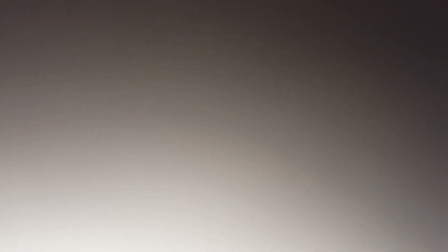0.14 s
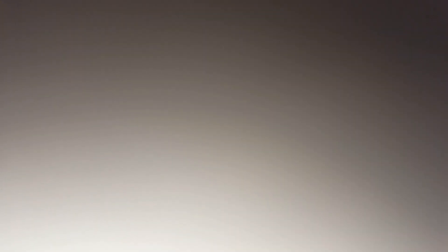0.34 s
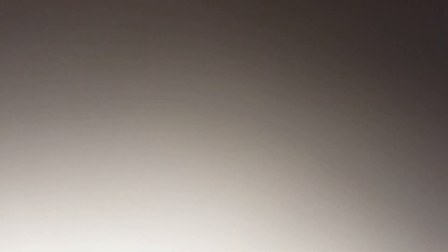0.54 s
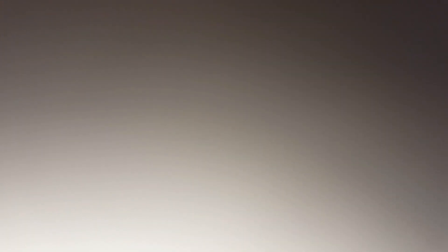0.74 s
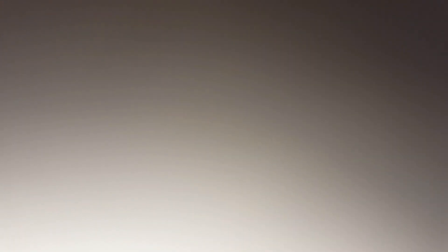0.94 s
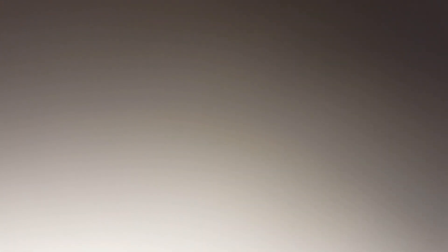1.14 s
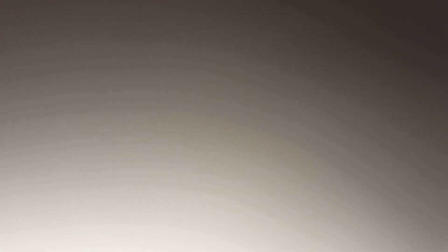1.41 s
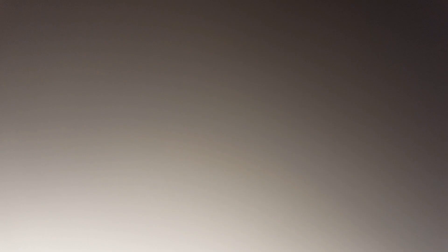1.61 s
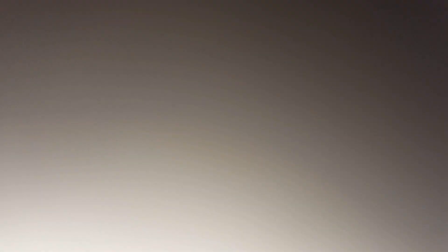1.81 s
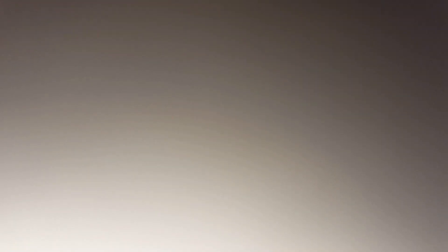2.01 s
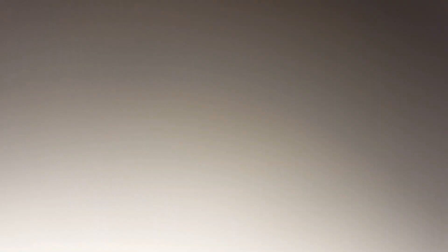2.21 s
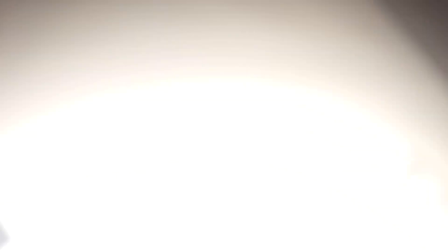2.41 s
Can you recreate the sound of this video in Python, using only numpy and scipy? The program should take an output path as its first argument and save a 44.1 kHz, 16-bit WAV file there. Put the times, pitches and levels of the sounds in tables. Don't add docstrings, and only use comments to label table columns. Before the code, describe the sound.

Bright roaring air jet escaping a valve, jolting once, dying down amid handling creaks, final click

```python
import sys
import numpy as np
from scipy import signal
from scipy.fft import rfft, irfft, next_fast_len
from scipy.io import wavfile
from scipy.ndimage import map_coordinates

SR = 44100
rng = np.random.default_rng(int(sys.argv[2]) if len(sys.argv) > 2 else 0)


def to_wav(sig):
    pcm = np.clip(np.atleast_2d(sig), -1, 1) * 32767
    pcm = np.round(pcm).astype(np.int16)
    wavfile.write(sys.argv[1], SR, pcm.T)


def voltage_ratio(decibels):
    exponent = np.asarray(decibels, float) / 20
    return 10 ** exponent


N = 112454

ALIKE_LOW, ALIKE_HIGH = 0.52, 0.33


def rms_one(x):
    return x / np.sqrt(np.mean(x ** 2, axis=-1, keepdims=True) + 1e-20)


def noise(*shape):
    return rng.standard_normal(shape)


def band(x, low_hz, high_hz, order=2):
    return signal.sosfilt(signal.butter(order, [low_hz, high_hz], "band", fs=SR, output="sos"), x)


def stereo(right_db):
    return voltage_ratio([[0], [right_db]])


def in_time(rows):
    s, *columns = np.transpose(rows)
    return [np.interp(np.arange(N) / SR, s, c) for c in columns]


def drift(rate_hz):
    r = np.exp(-40 * np.pi * rate_hz / SR)
    slow = signal.lfilter([1], [1, -2 * r, r * r], noise(N // 20 + 4002))[4000:]
    return np.interp(np.arange(N) / 20, np.arange(len(slow)), rms_one(slow))


def ring(x, hz, t60_s):
    r = voltage_ratio(-60 / (t60_s * SR))
    w = 2 * np.pi * hz / SR
    return signal.lfilter([0, np.sin(w)], [1, -2 * r * np.cos(w), r * r], x + 1e-18)


def gate(start_s, length_s, attack_s, release_s):
    t = np.arange(N) / SR - start_s
    return np.clip(t / attack_s, 0, 1) * np.exp(-np.clip(t - length_s, 0, None) / release_s)


def swept(hz, width_hz):
    r = np.exp(-np.pi * width_hz * 1.5 / SR)
    turn = 2 * np.pi * np.cumsum(hz) / SR
    slow = signal.lfilter([1], [1, -2 * r, r * r], noise(2, N))
    return rms_one(slow[0] * np.cos(turn) + slow[1] * np.sin(turn))


def air(left, right, alike, patchy_db, together_db, tilt_db=0, count=14):
    # frequency in Hz, phase in radians.
    port_phase = [(1000, 0.1), (1900, 2), (2450, 3.2), (3200, 6.1), (4150, 7.7), (4900, 10), (6200, 9.5),
                  (8200, 14)]
    size = next_fast_len(N)
    hz = np.arange(size // 2 + 1) * SR / size + 1e-3
    shared, own_left, own_right = rfft(noise(3, size))
    lag = np.exp(-1j * np.interp(hz, *np.transpose(port_phase)))
    common, own = np.sqrt(alike) * shared, np.sqrt(1 - alike)
    pair = np.array([common * lag + own * own_left, common + own * own_right])
    for side, points in zip(pair, (left, right)):
        f, db = np.transpose(points)
        knots = np.log([f[0] / 2, *f, f[-1] * 2])
        side *= voltage_ratio(np.interp(np.log(hz), knots, [db[0] - 30, *db, db[-1] - 30]))
    pair /= np.sqrt(np.mean(abs(pair) ** 2, axis=1, keepdims=True) / size)

    centres = np.geomspace(left[0][0], left[-1][0], count)
    place = np.interp(np.log(hz), np.log(centres), np.arange(count))
    together = together_db * drift(8.3)
    out = 0
    for k, centre in enumerate(centres):
        flicker = np.array([patchy_db * drift(2.0), patchy_db * drift(6.7)])
        level_db = flicker + together + tilt_db * np.log2(centre / 10000)
        weight = np.clip(1 - abs(place - k), 0, 1)
        out = out + voltage_ratio(level_db) * irfft(pair * weight, size)[:, :N]
    return out


def bounced(x):
    # delay in seconds, left gain, right gain.
    bounces = [
        (.00031, .3, .15),
        (.0013, .25, .25),
        (.0037, .25, .25),
        (.0081, .25, .25),
    ]
    sway_s = 0.000025
    out = x.copy()
    for lag_s, *gains in bounces:
        delay_s = lag_s + sway_s * np.sqrt(lag_s / 0.00027) * drift(1.3)
        late = np.arange(N) - delay_s * SR
        out += [g * map_coordinates(side, [late], order=3, mode="mirror") for side, g in zip(x, gains)]
    return out


def jet():
    # time in seconds, level in dB, left over right in dB,
    # brightness in dB per octave, roar against hiss in dB.
    flow = [(0, -21, 3.5, 2, -3.5), (.27, -22.5, 7, -0.9, -1.5), (.52, -18, 5.5, 0.4, 0),
            (.73, -22, 5, -1, -2), (.9, -21.5, 7, 2, 0.5), (1.02, -27.5, 8, 1, 0.5), (1.29, -31, 9, 0, 1.5),
            (1.4, -25, 5.5, -1.5, -2), (1.65, -35.5, 4, -0.5, 3), (1.92, -34, 4, -4.5, -2.5),
            (1.99, -32, 3.5, 4.5, 4.5), (2.025, -47, 7, 3, 2), (2.055, -40.5, 7, -5, 0),
            (2.115, -47, 5, -3, 10), (2.225, -48.5, 4, -4, 4.5), (2.245, -55.5, 4, 7, 9),
            (2.42, -52.5, 9.5, -4, 7), (2.55, -54.5, 2, -1, 7)]
    # frequency in Hz, density in dB per Hz.
    hiss_left = [(3300, -20), (4250, -2.5), (6050, -11.5), (6900, -7), (8900, 0.5), (10400, -8.5),
                 (13900, 2), (16000, -15.5)]
    hiss_right = [(3300, -12), (4600, -8), (6000, -8), (7900, 0), (9900, -10), (12500, -1), (14200, -2),
                  (16000, -2)]
    roar_colour = [(30, -12), (95, -3), (380, -4), (1300, 0.5), (2000, 1), (2400, 2.5), (2800, 0.5),
                   (4500, -50)]
    ridge_hz, ridge_width_hz, ridge_db, roar_base_db = 4130, 170, -17, -12

    db, pan_db, tilt_db, roar_db = in_time(flow)
    left_db, right_db = db + pan_db / 2, db - pan_db / 2
    hiss = air(hiss_left, hiss_right, ALIKE_HIGH, patchy_db=0.9, together_db=0.8, tilt_db=tilt_db)
    hiss = bounced(voltage_ratio([left_db, right_db]) * hiss)
    ridge = voltage_ratio(left_db + ridge_db + 2 * drift(8)) * swept(ridge_hz + 40 * drift(2), ridge_width_hz)
    roar = air(roar_colour, roar_colour, ALIKE_LOW, patchy_db=1.1, together_db=1.1)
    roar = voltage_ratio(roar_base_db + roar_db + right_db + 1.5 * drift(35)) * roar
    return hiss + ridge * stereo(-15) + roar


def surges():
    # start in seconds, length in seconds, level in dB, sag in dB per second.
    openings = [
        (0.541, 0.13, -17, 26),
        (1.307, 0.39, -34.5, 17),
        (1.942, 0.082, -42.5, 14),
    ]
    # frequency in Hz, density in dB per Hz.
    colour_left = [(2450, -22), (2850, -14), (3600, -6.5), (4150, 3.5), (4750, -5), (5400, -34),
                   (7300, -1.5), (15800, -47)]
    colour_right = [(2450, -26), (2800, 0), (4300, 0), (6300, -1), (8000, -5), (9600, -12), (15800, -12)]
    # start in seconds, end in seconds, frequency in Hz, width in Hz.
    whistle = (2.123, 2.232, 8750, 950)
    attack_s, release_s, right_db, whistle_db = 0.0015, 0.013, -5, -43

    t = np.arange(N) / SR
    shape = 0
    for start_s, length_s, db, sag in openings:
        sagging_db = db - sag * np.clip(t - start_s, 0, length_s)
        shape = shape + voltage_ratio(sagging_db) * gate(start_s, length_s, attack_s, release_s)
    hiss = air(colour_left, colour_right, ALIKE_LOW, patchy_db=1.6, together_db=1.3, count=10)

    start_s, end_s, hz, width_hz = whistle
    thin = rms_one(band(noise(N), hz - width_hz / 2, hz + width_hz / 2))
    thin = voltage_ratio(whistle_db) * gate(start_s, end_s - start_s, 0.0052, 0.0034) * thin
    return shape * stereo(right_db) * hiss + thin * stereo(-14)


def throat():
    # time in seconds, level in dB, frequency in Hz.
    course = [
        (.541, -62, 3700),
        (.546, -18.5, 3800),
        (.575, -16, 4334),
        (.615, -16, 4400),
        (.635, -25, 4450),
        (.7, -20, 4180),
        (.73, -46, 4230),
        (.8, -70, 4060),
    ]
    width_hz = 530
    db, hz = in_time(course)
    return voltage_ratio(db + 1.8 * drift(60)) * swept(hz, width_hz) * stereo(-16)


def cup():
    # time in seconds, level in dB, cavity frequency in Hz.
    cavity = [(0, -59, 1350), (.1, -34.5, 1400), (.27, -49.5, 1383), (.35, -32.5, 1436), (.43, -43, 1362),
              (.56, -38, 1294), (.83, -42, 1277), (1.27, -58, 1900), (1.34, -34.5, 1550),
              (1.41, -28.5, 1317), (1.47, -29.5, 1220), (1.53, -45.5, 1300), (1.78, -55, 1597),
              (1.87, -34, 1277), (2.02, -41.5, 1378), (2.2, -48.5, 1339), (2.40, -45, 1598),
              (2.455, -55, 1630)]
    width_hz, grain_db = 200, 2.5
    upper_ratio, upper_width_hz, upper_db = 1.55, 700, -10
    db, hz = in_time(cavity)
    body = swept(hz, width_hz) + voltage_ratio(upper_db) * swept(upper_ratio * hz, upper_width_hz)
    return voltage_ratio(db) * rms_one(voltage_ratio(grain_db * drift(53)) * body) * stereo(-22)


def creaks():
    # start in seconds, peak level in dB, pitch in Hz, left over right in dB, snap level in dB.
    slips = [(.001, -27.5, 107, 20, -60), (.100, -19, 1390, 4, -30), (.108, -32, 410, 18, -45),
             (.121, -26, 1400, 8, -40), (0.205, -32, 392, 5, -29), (.322, -28, 640, -1, -31),
             (0.338, -27, 1450, 14, -10), (.362, -22, 1410, 12, -40), (1.455, -41, 480, 13, -45),
             (1.462, -13.5, 1320, 27, -34), (1.602, -35, 322, 28, -48), (1.67, -30.5, 300, 29, -48),
             (1.734, -37, 418, 28, -39), (1.876, -31, 520, 25, -45), (1.894, -32, 470, 27, -51),
             (1.949, -15.5, 4000, 15, -40), (2.217, -40, 800, 9, -50), (2.232, -31, 2580, 12, -34),
             (2.234, -25.5, 1400, 20, -40), (2.247, -30.5, 800, 6, -37), (2.259, -45, 2000, -3, -39),
             (2.284, -30, 4100, 20, -36), (2.288, -31.5, 800, 16, -42), (2.311, -38, 1520, 19, -39),
             (2.321, -25.5, 1506, 24, -33), (2.331, -36, 1400, 21, -37), (2.354, -30, 927, 30, -48),
             (2.360, -23, 1450, 32, -40), (2.367, -28, 1360, 32, -46), (2.375, -28, 1590, 27, -50)]
    cycles, snap_s, snap_right_db = 12.0, 0.0014, -9
    out = np.zeros((2, N + 4000))
    t = np.arange(2000) / SR
    for start_s, db, hz, pan_db, snap_db in slips:
        grain = noise(len(t))
        push = np.gradient((1 + 0.4 * grain) * np.exp(-8 * hz * t) * (t > 0))
        tick = ring(push, hz, min(cycles / hz, 0.012 + 3 / hz))
        snap = band(grain * np.exp(-t / snap_s), 500, 5000)
        i = int(start_s * SR)
        out[:, i:i + len(t)] += voltage_ratio([[db], [db - pan_db]]) * tick / abs(tick).max()
        out[:, i:i + len(t)] += voltage_ratio(snap_db) * stereo(snap_right_db) * snap / abs(snap).max()
    return out[:, :N]


def bumps():
    # start in seconds, length in seconds, level in dB.
    knocks = [(0, 0.011, -36), (0.362, 0.047, -43), (0.44, 0.023, -39), (0.502, .04, -41),
              (0.736, 0.089, -45), (0.94, 0.061, -48), (1.455, 0.013, -46), (1.606, 0.019, -48),
              (1.66, 0.014, -47), (1.723, 0.019, -56), (1.923, 0.068, -56), (2.146, 0.033, -53),
              (2.235, 0.017, -48.5), (2.277, 0.034, -46), (2.311, 0.026, -42)]
    centre_hz, right_db = 90, -19
    low = band(noise(2, N + SR), centre_hz / 2, centre_hz * 2)[:, SR:]
    shape = sum(voltage_ratio(db) * gate(start_s, length_s, 0.0029, 0.019) for start_s, length_s, db in knocks)
    return shape * rms_one(low) * stereo(right_db)


def slides():
    # start in seconds, length in seconds, level in dB.
    strokes = [(0.09, 0.03, -43), (.19, .03, -45), (.31, 0.096, -41.5), (0.445, 0.097, -39),
               (0.78, 0.045, -41.5), (1.035, 0.026, -46), (1.303, 0.1336, -51.5), (1.85, .1, -52),
               (2.222, .07, -55), (2.326, 0.036, -55.5)]
    # frequency in Hz, density in dB per Hz.
    rustle = [(250, -34), (380, 8.5), (600, -4), (900, 7.5), (1300, -13), (2200, -5)]
    attack_s, release_s, right_db = 0.021, 0.02, -1
    shape = sum(voltage_ratio(db) * gate(start_s, length_s, attack_s, release_s) for start_s, length_s, db in strokes)
    return shape * stereo(right_db) * air(rustle, rustle, ALIKE_LOW, patchy_db=1.2, together_db=1.5, count=6)


def latch():
    # frequency in Hz, level in dB, t60 in seconds.
    modes = [(1550, -9.5, 0.0074), (2005, -0.5, 0.0091), (2367, -3, 0.0047), (2970, -6, 0.003),
             (3680, -2.5, 0.0089), (6110, -9, 0.0051), (8040, -7.5, 0.01), (10700, -7, 0.0055)]
    click_s, click_db, right_db = 2.4853, -20.5, -12.5
    tail_db, tail_t60_s = -45, 0.039
    hit = np.zeros(N)
    hit[int((click_s - 0.0005) * SR)] = -0.3
    hit[int(click_s * SR)] = 1
    snap = sum(voltage_ratio(db) * ring(hit, hz, t60_s) for hz, db, t60_s in modes)
    snap = band(snap, 1250, 9500, order=4)
    walls = rms_one(band(noise(2, N), 1100, 4500))
    tail = voltage_ratio(tail_db) * gate(click_s + 0.0019, 0, 0.001, tail_t60_s / np.log(1000)) * walls
    return (voltage_ratio(click_db) * snap + tail) * stereo(right_db)


def background():
    floor_db, rumble_db = -60, -60
    floor = rms_one(band(noise(2, N), 1500, 6000, order=1))
    rumble = rms_one(band(noise(2, N), 45, 260))
    return (voltage_ratio(floor_db) * floor + voltage_ratio(rumble_db) * rumble) * stereo(-8)


def scene():
    valve = voltage_ratio(0.5) * (jet() + bounced(surges())) + throat()
    hand = cup() + creaks() + bumps() + slides()
    return valve + hand + latch() + background()


def top_cut(x):
    return signal.sosfilt(signal.butter(12, 16020, fs=SR, output="sos"), x)


def record(dry):
    cutoff_hz = 15950
    soft = 1.1 * np.tanh(dry / 1.1)
    mix = signal.sosfilt(signal.ellip(10, 0.5, 80, cutoff_hz, fs=SR, output="sos"), soft)
    return top_cut(mix)


dry = scene()
out = record(dry)
to_wav(out)
```